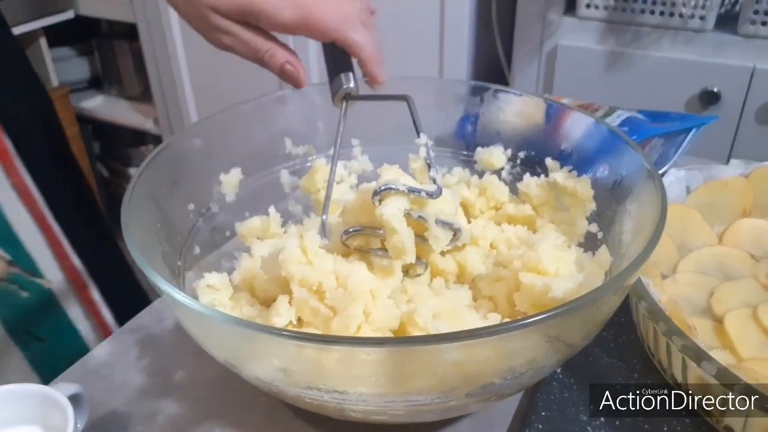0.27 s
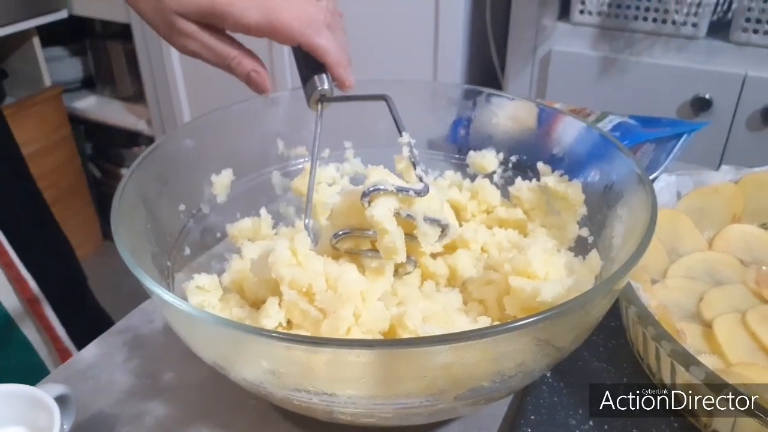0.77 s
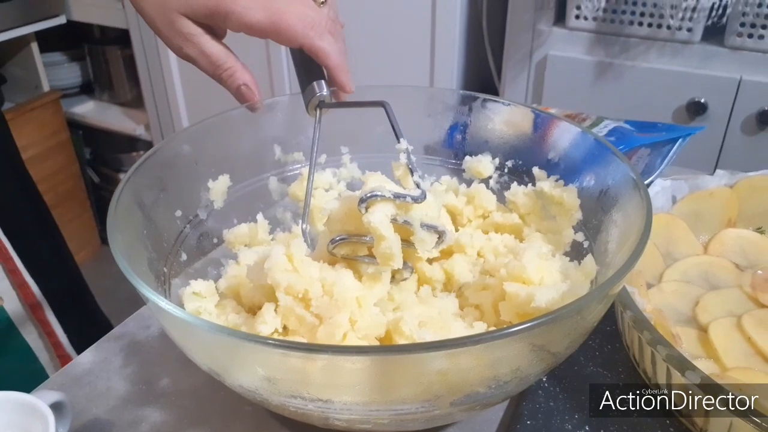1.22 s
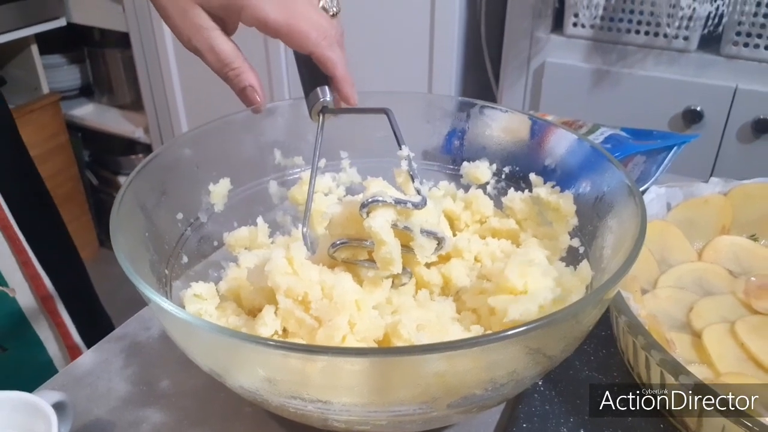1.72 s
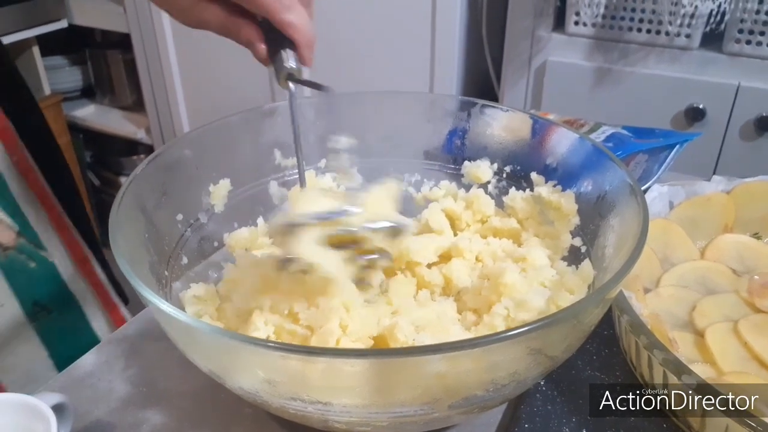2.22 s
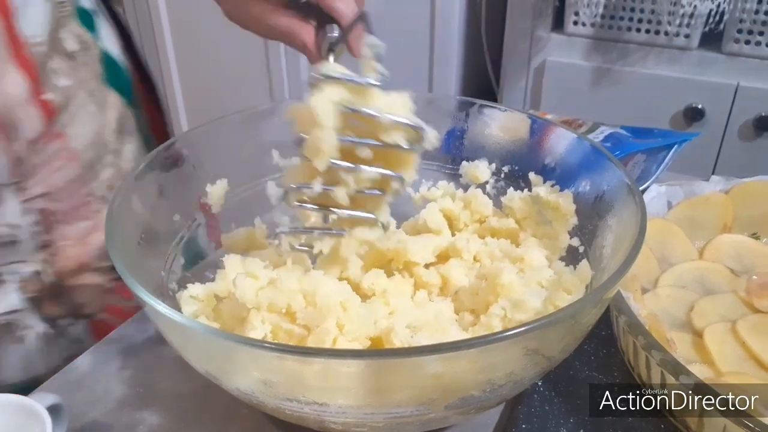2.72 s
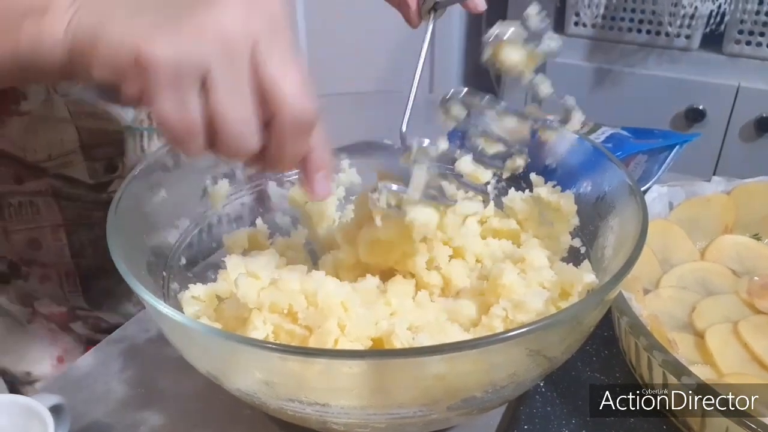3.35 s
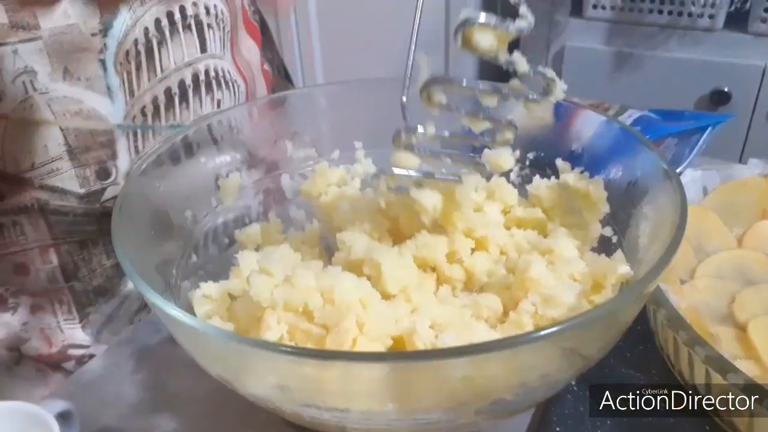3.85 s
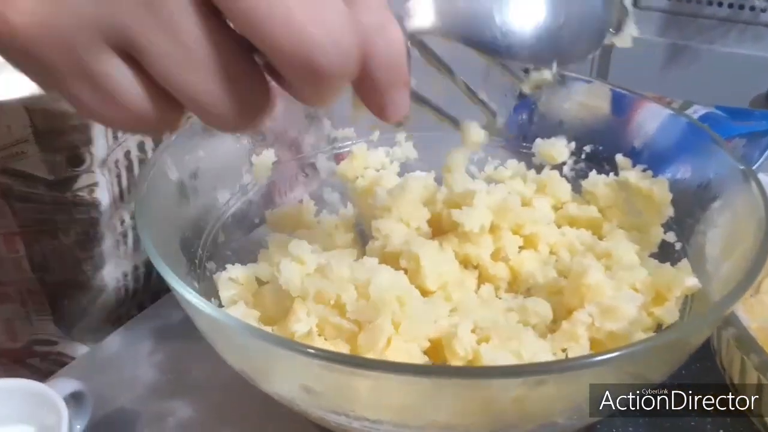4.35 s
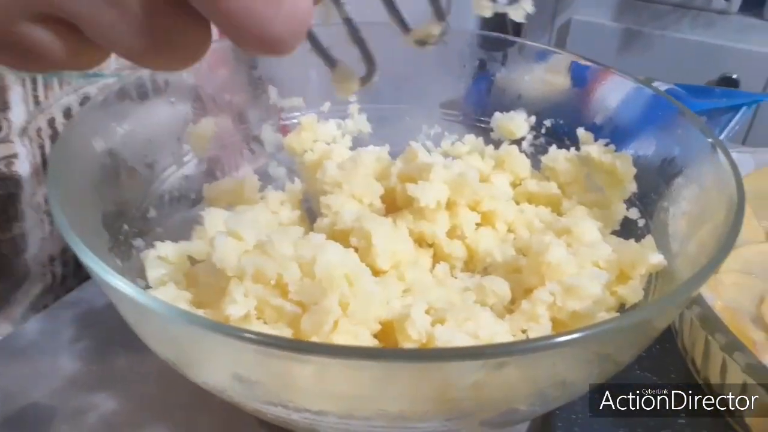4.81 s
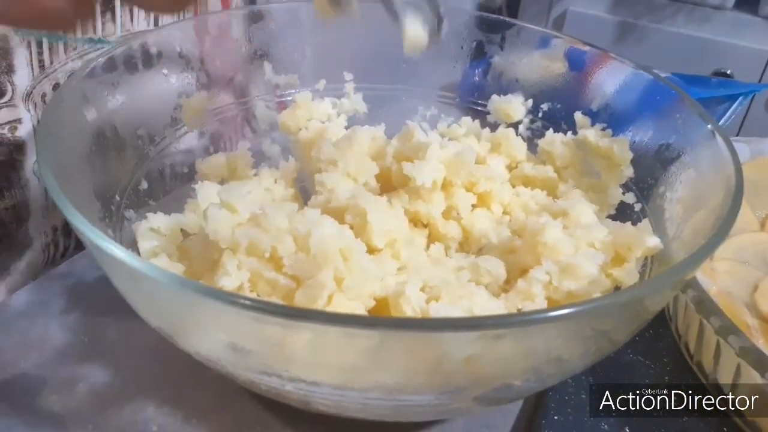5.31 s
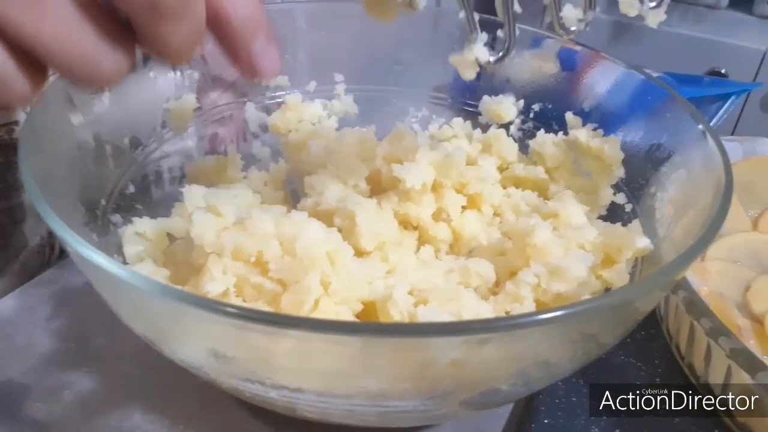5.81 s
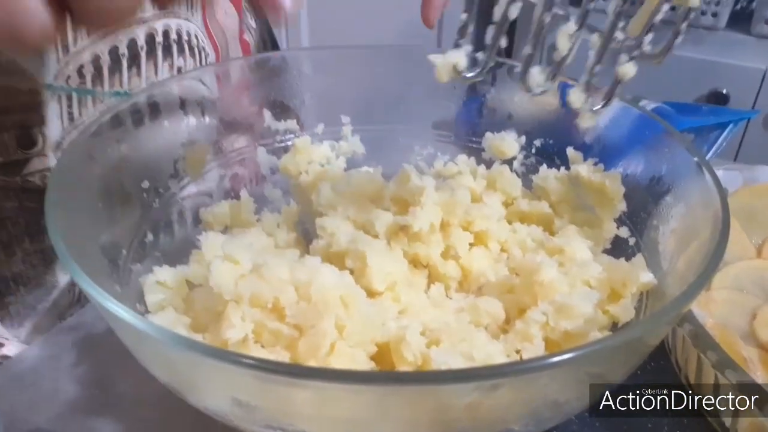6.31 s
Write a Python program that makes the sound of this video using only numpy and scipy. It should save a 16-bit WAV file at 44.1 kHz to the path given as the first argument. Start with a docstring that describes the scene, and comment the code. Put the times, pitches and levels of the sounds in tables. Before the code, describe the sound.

In a small kitchen with low appliance rumble, a masher wire clinks lightly on a glass bowl, then presses into soft potato with moist, crackly squelches and a faint bowl hum. A loud cushioned double thump shakes bowl and worktop. A spoon then picks the wires clean in bright, short steel ticks with sticky smears and a few soft thumps close to the microphone.

```python
"""A wire masher is pressed into boiled potatoes in a glass bowl, in a small kitchen.
Grainy noise in shifting resonances makes the squelches; narrow resonances make the bowl hum along.
Decaying modes ring after wire clinks on the glass and cushioned blows that shake bowl and worktop.
Then a spoon picks the wires clean: steel-coloured ticks, swelling sticky smears and soft pressure thumps
at the microphone. Low appliance rumble runs throughout."""
import sys
import numpy as np
from scipy import signal
from scipy.fft import rfft, irfft, next_fast_len
from scipy.io import wavfile
from scipy.ndimage import uniform_filter1d

SR = 44100
rng = np.random.default_rng(int(sys.argv[2]) if len(sys.argv) > 2 else 0)


def store_wav(level_fs):
    """Save 16-bit WAV to argv[1]."""
    pcm = np.round(np.clip(np.atleast_2d(level_fs), -1, 1) * 32767)
    wavfile.write(sys.argv[1], SR, pcm.T.astype(np.int16))


N = 289692


def from_db(db):
    """Decibels to gain."""
    return 10 ** (np.asarray(db) / 20)


def rms_one(x):
    """Scale to an rms of 1."""
    return x / np.sqrt(np.mean(x ** 2) + 1e-20)


def clock():
    """Time of every sample, s."""
    return np.arange(N) / SR


def at_hz(points, hz):
    """Read a table on a log-frequency axis."""
    known_hz, values = np.transpose(points)
    return np.interp(np.log(np.maximum(hz, 1)), np.log(known_hz), values)


def panned(pan_db):
    """Left and right gains; positive leans left."""
    return from_db(np.array([[pan_db], [-pan_db]]) / 2)


def add(out, start_s, sound):
    """Mix a short sound in at start_s."""
    start = max(round(start_s * SR), 0)
    out[:, start:start + sound.shape[-1]] += sound[..., :N - start]


def band(x, low_hz, high_hz, order=2):
    """Causal band-pass."""
    sos = signal.butter(order, [low_hz, high_hz], "band", fs=SR, output="sos")
    return signal.sosfilt(sos, x)


# Stereo correlation of noise and modes: f/Hz, left-right correlation (-1 to 1)
LIKENESS = [(100, .93), (330, .8), (600, .4), (1100, -.2), (2200, .1), (4000, 0), (16000, -.03)]


def noise(spectrum=None, size=N):
    """Stereo noise of rms 1, alike in both channels in the bass and nearly unrelated in the treble."""
    padded = next_fast_len(size, True)
    hz = np.fft.rfftfreq(padded, 1 / SR)
    mid, side = rfft(rng.standard_normal((2, padded)))
    alike = at_hz(LIKENESS, hz)
    both = np.sqrt(1 + alike) * mid + np.sqrt(1 - alike) * side * [[1], [-1]]
    colour = 1 if spectrum is None else from_db(at_hz(spectrum, hz))
    return rms_one(irfft(both * colour, padded)[:, :size])


def struck(modes, t, longest_t60_s=0.34):
    """Decaying modes, none ringing longer than longest_t60_s; the higher ones differ in phase left to right."""
    out = np.zeros((2, len(t)))
    for hz, level_db, t60_s in modes:
        apart_rad = np.arccos(at_hz(LIKENESS, hz)) * rng.choice([-1, 1])
        phase = rng.uniform(0, 2 * np.pi) + np.array([[0], [apart_rad]])
        decay = 1000 ** (-t / min(t60_s, longest_t60_s))
        out += from_db(level_db) * decay * np.sin(2 * np.pi * hz * t + phase)
    return out


def ripple(x, depth_db, spacing_hz):
    """Crowded damped resonances lift some frequencies and sink others; output rms 1."""
    size = x.shape[-1]
    hz = np.fft.rfftfreq(size, 1 / SR)
    knots_hz = np.arange(0, SR / 2, spacing_hz)
    level_db = depth_db * np.clip(rng.standard_normal(len(knots_hz)), -2.5, 1.5)
    return rms_one(irfft(rfft(x) * from_db(np.interp(hz, knots_hz, level_db)), size))


def crackle(per_s, spread_db, grain_s):
    """Envelope of many tiny random grains of differing size; rms 1."""
    sizes = from_db(spread_db * np.clip(rng.standard_normal(N), -2, 2))
    pops = (rng.random(N) < per_s / SR) * sizes
    energy = signal.lfilter([1], [1, -np.exp(-1 / (grain_s * SR))], pops + 1e-18)
    return rms_one(np.sqrt(energy))


def swell_and_fade(t, swell_s, fade_s):
    """Exponential growth to a crest of 1 at time 0, then exponential decay."""
    return np.exp(-np.minimum(np.maximum(-t / swell_s, t / fade_s), 20))


def snap(t, crest_s=0.0011):
    """Envelope of a damped contact: a crest of 1 at crest_s, gone a few ms later."""
    age = t / crest_s
    return age * np.exp(1 - age)


# Steel colour: f/Hz, spectral level/dB
TICK = [(100, -15), (500, -22), (800, -18.5), (1500, -18), (2400, -15), (3500, -10.5), (4600, -6),
        (6000, -7.5), (8500, -4), (9600, -3), (11700, 0), (13200, -1), (14000, -8.5), (14900, -6.5)]
# Damped resonances of spoon and wires: f/Hz, width/Hz, lift above the colour/dB
METAL = [(1850, 140, 7), (2500, 100, 4), (3700, 240, 5), (6370, 870, 4), (8200, 1500, 3), (11470, 310, 9.5)]


def metal_noise(size, body_db=0, body_hz=3500):
    """Bright noise coloured by the resonances of the steel, its body lifted below body_hz; rms 1."""
    hz = np.geomspace(50, SR / 2, num=600)
    level_db = at_hz(TICK, hz) + body_db / (1 + (hz / body_hz) ** 2)
    for centre_hz, width_hz, lift_db in METAL:
        level_db = level_db + lift_db / (1 + (2 * (hz - centre_hz) / width_hz) ** 2)
    return noise(np.transpose([hz, level_db]), size=size)


# Blow colour: f/Hz, spectral level/dB
KNOCK = [(40, -14), (130, -6), (330, 2), (480, -8), (800, -8), (1300, -11), (2300, -12.5), (3200, -14),
         (4500, -19.5), (7000, -22), (16000, -46)]


def clatter(t, rise_s, t60_s, low_hz, high_hz, crack_db, crack_s=0.001):
    """A crack and the dull clatter that dies away after a blow."""
    body = ripple(band(noise(KNOCK, size=len(t)), low_hz, high_hz), depth_db=3.0, spacing_hz=45.37)
    fade = 1000 ** (-np.maximum(t - rise_s, 0) / t60_s)
    return body * (fade + from_db(crack_db) * np.exp(-t / crack_s))


# Rumble colour: f/Hz, spectral level/dB
AIR = [(30, -29.5), (62, -6), (100, 6), (160, -5.5), (210, 3), (270, -2.5), (380, 4), (500, -16),
       (650, -19.5), (1000, -23), (3000, -28.5), (8000, -28.5), (16000, -33.5)]
# Rumble balance: f/Hz, left-right/dB
AIR_PAN = [(60, -10.5), (200, -3.5), (450, -2), (1000, 0.5), (8000, -0.5)]
# Rumble gain: t/s, level/dB
RUMBLE = [(0, -62.5), (0.9, -64), (2.002, -69), (2.6, -60.5), (3.3, -61.5), (3.75, -69.5), (6.57, -68)]
HUM_HZ, HUM_DB_RE_RUMBLE = 105.2, -0.5


def background():
    """Low appliance rumble: coloured noise plus a steady low hum, bass stronger on the right."""
    hum = from_db(HUM_DB_RE_RUMBLE) * np.sin(2 * np.pi * HUM_HZ * clock())
    gain_db = np.interp(clock(), *np.transpose(RUMBLE))
    rumble = (noise(AIR) + hum) * from_db(gain_db)
    pan_db = at_hz(AIR_PAN, np.fft.rfftfreq(N, 1 / SR))
    return irfft(rfft(rumble) * from_db(np.array([pan_db, -pan_db]) / 2), N)


# Bowl modes: f/Hz, level/dB, t60/s, capped at longest_t60_s
GLASS = [(382, -4.5, 0.25), (508, -14.5, 0.26), (865, -6, 0.26), (1100, -10.5, 0.11), (1486, -13, 0.34),
         (1630, -10.5, 0.1), (2240, -14.5, 0.29), (3110, -16.5, 0.1), (4000, -18, 0.17),
         (5000, -30.5, 0.16), (6300, -28, .11), (7700, -40.5, .1), (9100, -36, .1)]
# Wire touches glass: t/s, level/dB, rise/s
CLINKS = [(0.066, -31.5, 0.00072), (0.1, -36.5, 0.0053)]
CLINK_T60_S, CLINK_LOW_HZ, CLINK_HIGH_HZ = 0.36, 158, 1400
CLINK_CLATTER_DB, CLINK_CRACK_DB = -8.5, 17.5  # crack relative to clatter
CLINK_WIRE_DB, CLINK_WIRE_T60_S = -32, 1


def clinks():
    """Bare wire hits the glass and bounces: clatter, glass modes and a shiver of the steel."""
    out, t = np.zeros((2, N)), clock()[:SR]
    for start_s, level_db, rise_s in CLINKS:
        contact = clatter(t, rise_s, CLINK_T60_S, CLINK_LOW_HZ, CLINK_HIGH_HZ, CLINK_CRACK_DB)
        shiver = from_db(CLINK_WIRE_DB - 60 * t / CLINK_WIRE_T60_S) * metal_noise(len(t))
        clink = from_db(CLINK_CLATTER_DB) * contact + shiver + struck(GLASS, t)
        add(out, start_s, from_db(level_db) * np.minimum(t / rise_s, 1) * clink)
    return out


def resonate(x, hz, width_hz):
    """One two-pole resonance."""
    r = np.exp(-np.pi * width_hz / SR)
    return signal.lfilter([1 - r, 0, r - 1], [1, -2 * r * np.cos(2 * np.pi * hz / SR), r * r], x)


def shifting(spectrum, depth_db, spacing_hz, shapes_per_s=9, count=5):
    """Noise through pockets that keep changing shape: sets of resonances fade in turn, cyclically."""
    out, shape = 0, clock() * shapes_per_s
    for k in range(count):
        weight = np.sqrt(np.maximum(1 - np.abs((shape - k) % count - 1), 0))
        out = out + weight * ripple(noise(spectrum), depth_db, spacing_hz)
    return out


# Hand leans on masher: start t/s, end t/s, relative squash level before sag/dB
PRESSES = [(0.259, 0.742, -43.5), (2.27, 2.77, -55)]
PRESS_ATTACK_S, PRESS_RELEASE_S, PRESS_SAG_DB_PER_S = 0.19, 0.055, 6.5
PRESS_FIZZ_DB = -22  # fizz flow relative to squash flow
# Mash pocket gives way: crest t/s, wet fizz relative level/dB, dull squash relative level/dB, swell/s
SQUELCHES = [(0.283, -51.5, -55, 0.012), (0.53, -36, -47, 0.018), (0.736, -39, -48, 0.022),
             (1.202, -33, -38.5, 0.0038), (1.367, -29, -32, 0.016), (1.423, -28.5, -34, 0.019),
             (1.466, -23.5, -26, 0.03), (1.567, -23.5, -35, 0.015), (1.677, -41, -35, 0.014),
             (1.723, -37, -51, 0.06), (2.15, -54.5, -38, 0.004), (2.307, -55, -56.5, 0.044),
             (2.805, -39, -51.5, .005), (2.872, -35, -41, 0.023), (3.028, -46, -51.5, 0.023)]
SQUELCH_FADE_S = 0.039


def mash_flow():
    """Strength of squash and fizz: presses swell, sag and let go; squelches add as power."""
    t, squash_power, fizz_power = clock(), 0, 0
    for start_s, end_s, level_db in PRESSES:
        held_s = np.maximum(t - start_s, 0)
        attack = np.sin(np.pi / 2 * np.minimum(held_s / PRESS_ATTACK_S, 1)) ** 2
        release = np.exp(-np.clip((t - end_s) / PRESS_RELEASE_S, 0, 20))
        press = from_db(level_db - PRESS_SAG_DB_PER_S * held_s) * attack * release
        squash_power = squash_power + press ** 2
        fizz_power = fizz_power + (from_db(PRESS_FIZZ_DB) * press) ** 2
    for crest_s, fizz_db, squash_db, swell_s in SQUELCHES:
        burst = swell_and_fade(t - crest_s, swell_s, SQUELCH_FADE_S)
        squash_power = squash_power + (from_db(squash_db) * burst) ** 2
        fizz_power = fizz_power + (from_db(fizz_db) * burst) ** 2
    return np.sqrt(squash_power), np.sqrt(fizz_power)


# Resonances of filled bowl under masher: f/Hz, width/Hz, relative level/dB
HOLLOW = [(323.8, 12, 4), (338, 30, -29), (503.4, 45, -7.5), (621, 13, -12), (223, 100, -9.5)]
# Dull squash colour: f/Hz, spectral level/dB
SQUASH = [(40, -38), (110, -9.5), (250, -15.5), (450, -4.5), (900, -1), (1900, 0), (2700, -8.5),
          (3800, -21), (7000, -24), (16000, -48)]
# Wet fizz colour: f/Hz, spectral level/dB
FIZZ = [(300, -27), (1500, -15.5), (3500, -8), (5000, -6.5), (6500, -6.5), (9000, -7), (12000, -3.5),
        (14500, -3), (16000, -0.5)]
# Bowl hum level at reference squash; exponent with which it follows the squash
BOWL_HUM_DB, BOWL_HUM_REFERENCE_DB, BOWL_HUM_FOLLOWS = -43, -47, 0.75


def pressing(squash_gain_db=-1.0, fizz_gain_db=6.0):
    """Mash is forced between the wires: it squashes, air fizzes out, and the bowl hums."""
    squash, fizz = mash_flow()
    hum = from_db(BOWL_HUM_DB) * (squash / from_db(BOWL_HUM_REFERENCE_DB)) ** BOWL_HUM_FOLLOWS
    friction, hollow = noise(), 0
    for hz, width_hz, level_db in HOLLOW:
        hollow = hollow + from_db(level_db) * rms_one(resonate(friction, hz, width_hz))
    # even out the slow level swings so the bowl hum stays steady
    hollow = hollow / np.sqrt(uniform_filter1d(np.mean(hollow ** 2, axis=0), size=2400))
    grains = crackle(per_s=5000, spread_db=4.0, grain_s=0.001)
    dull = from_db(squash_gain_db) * squash * shifting(SQUASH, depth_db=5.0, spacing_hz=44.65)
    bright = from_db(fizz_gain_db) * fizz * shifting(FIZZ, depth_db=9.0, spacing_hz=118.4)
    return hum * hollow + grains * (dull + bright)


# Worktop modes: f/Hz, level/dB, t60/s, capped at longest_t60_s
WORKTOP = [(149, -7.5, 1), (209, -10, .35), (295, -2, .3), (314, -3, 1), (450, -12.5, 0.3),
           (493, -11.5, 0.29), (646, -12, 0.94), (719, -11.5, 0.47), (1094, -6.5, 1), (1223, -12.5, 0.1),
           (1400, -14, .3), (1780, -5, 0.15), (1920, -7.5, 0.1), (2200, -5, 0.47), (2340, -10, 0.53),
           (2750, -13, 0.46), (2786, -11.5, 0.89), (3180, -17, 0.14), (3750, -17, 0.4)]
# Cushioned blows: t/s, level/dB, rise/s, lowest f/Hz, highest f/Hz, ring relative level/dB
BUMPS = [(1.078, -37, 0.022, 350, 850, -19), (2.134, -36, 0.026, 400, 2900, -9.5),
         (2.789, -14.5, 0.0054, 188, 4300, -4), (2.836, -21.5, 0.0024, 75.4, 190, -28.5)]
BUMP_T60_S, BUMP_GLASS_DB, BUMP_CRACK_DB = 0.36, -16.5, -1.5  # glass re worktop, crack re clatter


def bumps():
    """Blows cushioned by potato clatter and shake the bowl; glass and worktop ring on."""
    out, t = np.zeros((2, N)), clock()[:SR]
    for start_s, level_db, rise_s, low_hz, high_hz, ring_db in BUMPS:
        contact = clatter(t, rise_s, BUMP_T60_S, low_hz, high_hz, BUMP_CRACK_DB)
        ring = from_db(BUMP_GLASS_DB) * struck(GLASS, t) + struck(WORKTOP, t)
        rise = np.minimum(t / rise_s, 1)
        add(out, start_s, from_db(level_db) * rise * (contact + from_db(ring_db) * ring))
    return out


# Spoon and wires touch: t/s, relative level/dB, body lift at low f/dB
TICKS = [(3.098, -12, -9.5), (3.1745, -10.5, 3.5), (3.4203, -14, -7), (3.4397, -12.5, 7),
         (3.4642, -12, 7.5), (3.479, -17, -14), (3.497, -15, 5), (3.8172, -20.5, 0.5), (3.918, -44, 5),
         (4.0756, -26.5, -1.5), (4.1106, -22, -1), (4.1364, -12.5, -11), (4.161, -10, -8),
         (4.1784, -11.5, -3), (4.3917, -16, -11.5), (4.5323, -33, -3.5), (4.6202, -18, -6.5),
         (4.692, -20, 3), (4.9466, -28, -3.5), (4.9704, -23, -2), (5.0387, -15.5, -5.5), (5.226, -24.5, 0),
         (5.4719, -13.5, -2), (5.4986, -11.5, 13), (5.532, -15.5, -11), (5.5527, -10, -6.5),
         (5.9223, -29, 2.5), (6.4493, -24.5, 4), (6.4876, -20, 5.5)]
TICK_GAIN_DB, TICK_PAN_DB, TICK_ROOM_DB = -4.5, 1, -2
GRIT_DB, GRIT_FADE_S = -20.5, 0.0067  # relative to the crack


def ticks():
    """Mash damps the metal: a crack of a few ms, then a gritty skid; returns direct sound and room send."""
    out, t = np.zeros((2, N)), clock()[:2048]
    grains = crackle(per_s=500, spread_db=4.0, grain_s=0.0006)
    for start_s, level_db, body_db in TICKS:
        # every point of contact favours other resonances
        steel = ripple(metal_noise(len(t), body_db), depth_db=3.5, spacing_hz=353.2)
        grit = grains[round(start_s * SR):][:len(t)]
        skid = from_db(GRIT_DB) * np.exp(-t / GRIT_FADE_S) * grit
        add(out, start_s, from_db(level_db + TICK_GAIN_DB) * (snap(t) + skid) * steel)
    return out * panned(TICK_PAN_DB), out[0] * from_db(TICK_ROOM_DB)


# Sticky mash peels off wires: crest t/s, level/dB, swell/s
SMEARS = [(3.158, -37.5, .009), (3.915, -40.5, 0.013), (4.17, -26.5, 0.017), (4.4, -32.5, 0.003),
          (4.712, -40, .012), (5.036, -35.5, 0.0075), (5.231, -37, 0.015), (6.079, -41.5, 0.032)]
SMEAR_FADE_S = 0.01


def smears():
    """A sticky film tears with growing strength until the lump lets go."""
    out, lead = np.zeros((2, N)), SR // 4
    t = clock()[:2 * lead] - lead / SR
    grains = crackle(per_s=1500, spread_db=3.0, grain_s=0.001)
    for crest_s, level_db, swell_s in SMEARS:
        film = ripple(metal_noise(len(t), body_db=7.0), depth_db=7.0, spacing_hz=259.3)
        add(out, crest_s + t[0], from_db(level_db) * swell_and_fade(t, swell_s, SMEAR_FADE_S) * film)
    return out * grains


# Soft thumps at the microphone: t/s, relative level/dB, lowest f/Hz
THUMPS = [(3.421, -32, 100), (3.4661, -19, 52), (4.16, -37.5, 135), (4.180, -37, 135), (5.4744, -27, 62),
          (5.555, -24, 62)]
THUMP_HIGH_HZ, THUMP_PAN_DB, THUMP_BOOM_DB = 400, -17.5, -8
THUMP_CRACK_DB, THUMP_CRACK_BODY_DB, THUMP_CRACK_PAN_DB = -0.5, 39.5, -13.5


def thumps(boom_hz=103, boom_t60_s=0.12, crack_lead_s=0.0014):
    """A dull crack and a short push of pressure, mostly on the right, swings back and leaves a brief boom."""
    out, t = np.zeros((2, N)), clock()[:SR // 4]
    for start_s, level_db, low_hz in THUMPS:
        swing = -band(signal.unit_impulse(len(t)), low_hz, THUMP_HIGH_HZ, order=3)
        since_s = np.maximum(t - t[swing.argmin()], 0)
        boom_gain = from_db(THUMP_BOOM_DB - 60 * since_s / boom_t60_s)
        boom = boom_gain * np.sin(2 * np.pi * boom_hz * since_s)
        push = swing / np.abs(swing).max() + boom
        crack = snap(t) * metal_noise(len(t), THUMP_CRACK_BODY_DB)
        crack_gain = from_db(level_db + THUMP_CRACK_DB) * panned(THUMP_CRACK_PAN_DB)
        add(out, start_s - crack_lead_s, crack_gain * crack)
        add(out, start_s, from_db(level_db) * panned(THUMP_PAN_DB) * push)
    return out


# Room decay: f/Hz, t60/s
KITCHEN_T60 = [(150, 0.14), (600, 0.28), (2500, 0.25), (6000, 0.24), (11000, 0.17), (16000, 0.26)]


def kitchen(x, build_s=0.001):
    """Diffuse reflections of a small room, dying band by band; unit energy."""
    t = clock()[:SR // 2]
    hz = np.fft.rfftfreq(len(t), 1 / SR)
    white, tail = rfft(noise(size=len(t))), 0
    for k, (_, t60_s) in enumerate(KITCHEN_T60):
        share = at_hz([(row[0], j == k) for j, row in enumerate(KITCHEN_T60)], hz)
        tail = tail + irfft(white * share, len(t)) * 1000 ** (-t / t60_s)
    tail = rms_one(tail * (1 - np.exp(-t / build_s))) / np.sqrt(len(t))
    return signal.fftconvolve(x, tail, axes=1)[:, :N]


def scene(smear_room_db=-8.5, room_pan_db=-1.0):
    """Sum of all sources; ticks and smears also excite the room."""
    tick_direct, tick_room = ticks()
    sticky = smears()
    room = kitchen(tick_room + from_db(smear_room_db) * sticky) * panned(room_pan_db)
    masher = clinks() + pressing() + bumps()
    spoon = tick_direct + sticky + room + thumps()
    return background() + masher + spoon


CUTOFF_HZ = 15600


def record(dry):
    """Full scale limits the peaks, then a steep low-pass cuts the top."""
    lowpass = signal.ellip(10, 0.1, 80, CUTOFF_HZ, fs=SR, output="sos")
    return signal.sosfilt(lowpass, np.clip(dry, -1, 1))


dry = scene()
out = record(dry)
store_wav(out)
```